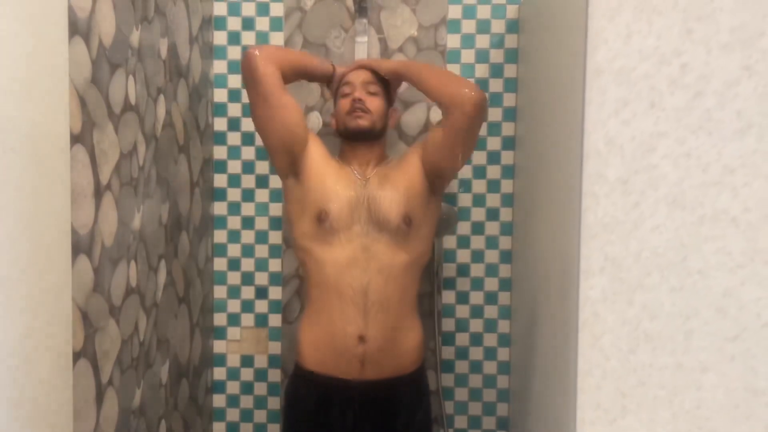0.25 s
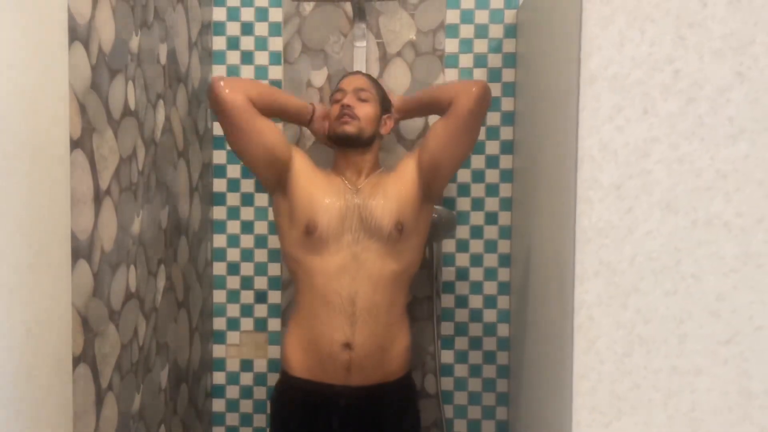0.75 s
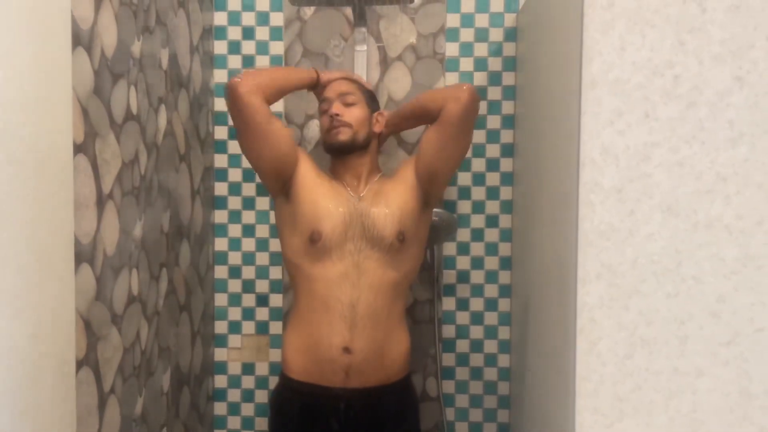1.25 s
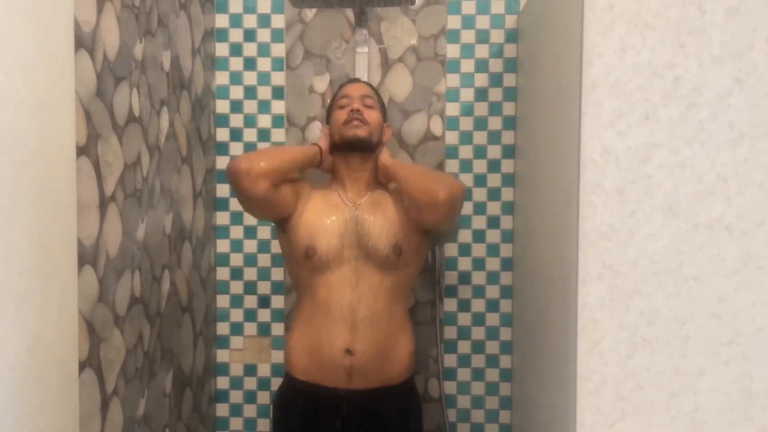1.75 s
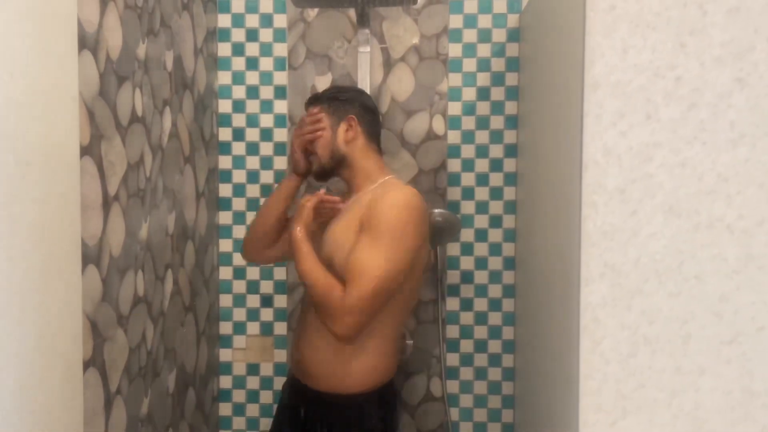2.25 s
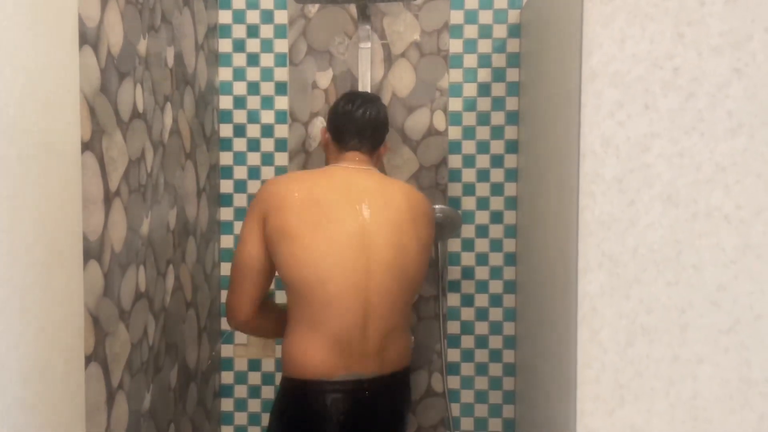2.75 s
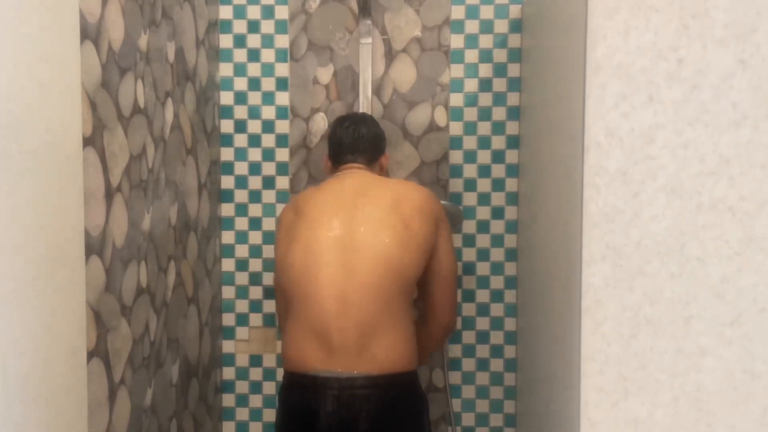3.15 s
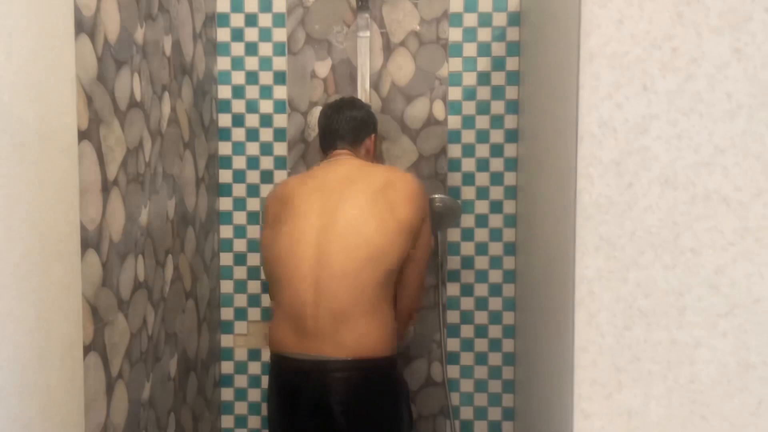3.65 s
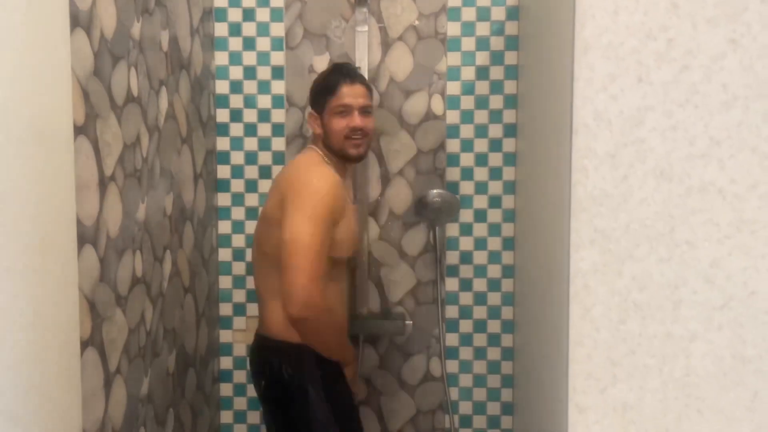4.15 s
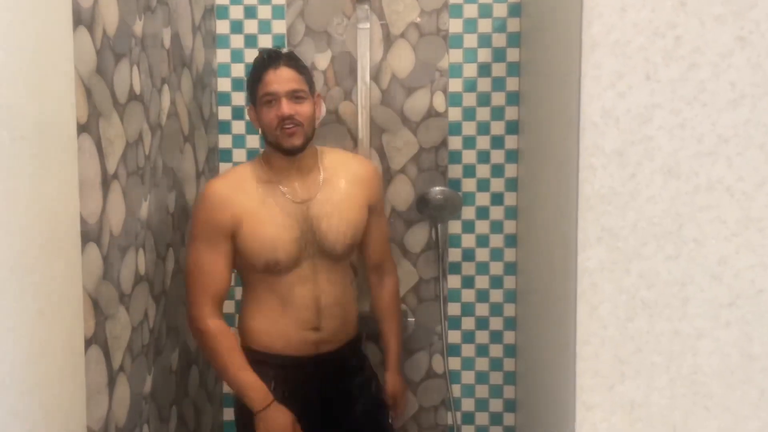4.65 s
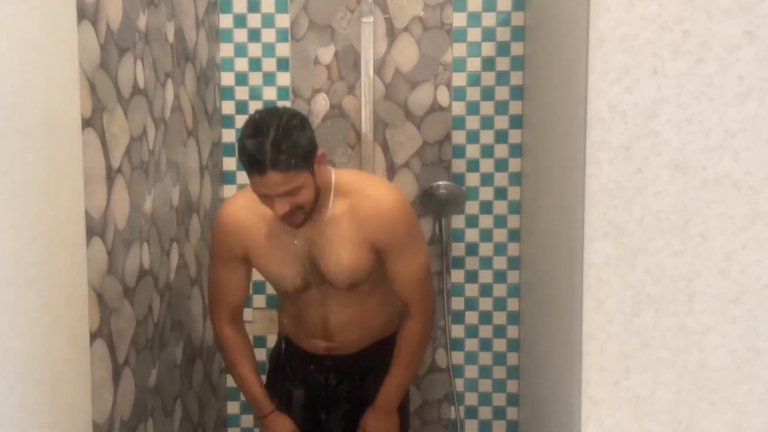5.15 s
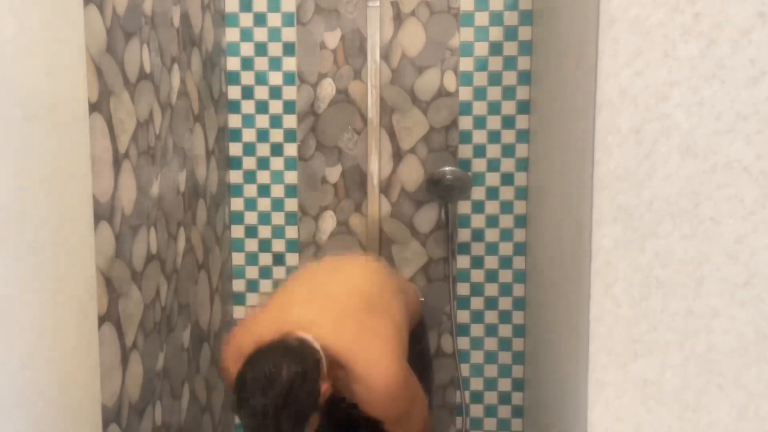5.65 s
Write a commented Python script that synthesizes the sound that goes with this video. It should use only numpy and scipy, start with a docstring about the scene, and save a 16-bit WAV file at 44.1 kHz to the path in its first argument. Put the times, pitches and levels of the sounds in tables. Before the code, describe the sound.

An overhead shower runs throughout in a small tiled stall. Fine spray hisses continuously, grained with tiny ticks, while heavy drops running off a body smack the wet floor at irregular moments, each with a sharp crack and quick wall echoes. Splats crowd the first second, thin out midway and grow heavier near the end. A low, wavering roar lies beneath. Close stereo pickup, bright but cut off at the very top.

```python
"""A small tiled stall with an overhead shower running, heard at two microphone ports a few centimetres apart.
Fine spray hisses as coloured noise; heavy drops run off a body and splat on the wet floor, each a sharp crack
with wall echoes and a ringing band of noise. Spatter, smaller drops and short clicks fill the gaps, and
bubbles plink as decaying sines. A low roar, noise picked out by resonances, fills the stall's standing waves."""
import sys
import numpy as np
from scipy import signal
from scipy.fft import rfft, irfft, next_fast_len
from scipy.io import wavfile
from scipy.ndimage import uniform_filter1d, map_coordinates

SR = 44100
rng = np.random.default_rng(int(sys.argv[2]) if len(sys.argv) > 2 else 0)


def unload_wav(signal):
    """Save mono or channel-first audio to the path in sys.argv[1] as 16-bit WAV at rate SR, clipped to [-1, 1]."""
    wavfile.write(
        sys.argv[1],
        SR,
        np.round(np.clip(np.atleast_2d(signal).T, -1, 1) * 32767).astype(np.int16),
    )


N = 260101

# Flow of the spray. Each row: time in seconds, level in dB before the tilt,
# brightness in dB (added to the bright part and taken from the dull part).
SPRAY_FLOW = [(0, -42.5, 2.5), (.4, -44.5, -2), (.8, -44, 1), (1.2, -43, 1), (1.6, -41.5, 2.5),
              (2.0, -44.5, -1.5), (2.4, -44.5, -2), (2.8, -43.5, -1.5), (3.2, -41.5, 2.5), (3.6, -39.5, 1),
              (3.9, -45.5, -2), (4.2, -44, -2), (4.6, -37, 2.5), (4.9, -42.5, 0), (5.2, -41.5, 1),
              (5.5, -40.5, -2.5), (5.9, -40, 2)]
# Colour of the spray, also shared by the drops. Each row: frequency in Hz, relative density in dB per Hz.
SPRAY_COLOUR = [(700, -30), (1500, -8), (2500, -5), (4000, -4), (5500, -4.5), (7000, -4), (9600, -5),
                (10500, -7), (11500, -11), (13000, -19), (14200, -23), (15700, -25)]


def spray():
    """Superposition: countless fine droplets merge into coloured noise, its dull and bright parts tilted."""
    flow_db, bright_db = curves(SPRAY_FLOW)
    mist = hiss(spray_gain, patchy_db=1.4)
    dull = filtered(mist, lambda hz: 1 / (1 + (hz / 6000) ** 4))
    bright = mist - dull
    return amp(flow_db) * (amp(-bright_db) * dull + amp(bright_db) * bright)


def spray_gain(hz):
    """Spectral envelope: the gain of the spray's colour at each frequency."""
    return amp(along(SPRAY_COLOUR, hz)[0])


# Heavy drops on the floor. Each row: start in seconds, splash level in dB, centre in Hz,
# octaves from the centre to half gain, crack relative to the splash in dB before the gain common to all cracks.
HEAVY_DROPS = [(0.0147, -42, 8800, 0.35, 10.5), (0.0825, -36, 11600, 1, 3), (0.1103, -37.5, 10400, 0.5, 2),
               (0.2322, -35, 3900, 0.93, 0), (0.2362, -37.5, 4400, 0.37, -1), (0.3215, -41, 11580, 0.63, 2),
               (0.331, -40, 5040, 0.37, 1), (0.4766, -43, 6200, 1.8, 11), (0.4926, -42, 10600, 0.41, 6),
               (0.533, -39.5, 7900, 0.46, 12), (0.5891, -44.5, 10500, 0.36, 7),
               (0.639, -39.5, 12500, 1.1, 2), (0.6627, -34, 6060, 0.38, -5), (0.668, -34.5, 4200, 0.71, 1),
               (0.686, -34.5, 2380, 0.37, -5), (0.755, -42.5, 2270, 1.1, -7), (0.815, -45, 2400, 0.32, 1),
               (0.9056, -43, 10600, 0.21, 7), (1.137, -44, 9250, 0.64, 5), (1.1757, -41.5, 10300, 0.28, -4),
               (1.2383, -45, 12500, 0.39, 8), (1.26, -39, 5800, 0.69, 12), (1.338, -35.5, 5830, 0.5, -11),
               (1.4366, -45, 10800, 0.4, 4), (1.482, -45, 10800, 0.49, 13), (1.4826, -38.5, 5900, 0.26, 6),
               (1.572, -46, 4000, .3, 3), (1.5813, -45.5, 5000, 0.26, 6), (1.608, -39.5, 12500, .5, 12.5),
               (1.6984, -44, 10500, 0.82, 10), (1.74, -38, 6750, 0.49, 5), (1.8032, -40.5, 2000, 0.44, -6),
               (1.8224, -38.5, 7000, 2.3, 9), (1.9016, -40.5, 10800, 0.39, 7),
               (1.9027, -39.5, 4430, 0.55, 5), (1.948, -42.5, 8980, 1.1, 9),
               (2.0886, -44, 11830, 0.71, 11.5), (2.1814, -41.5, 8600, 0.32, 1),
               (2.3362, -36, 9000, 0.35, 9), (2.4142, -38.5, 6100, 1.1, 9), (2.5175, -40, 8650, 1.2, -1),
               (2.5475, -34, 4530, 0.69, 1), (2.6084, -39.5, 12500, 0.49, -2),
               (2.875, -43, 11720, 0.44, 6.5), (3.023, -50, 10500, 0.24, 8), (3.0768, -44, 3940, 0.58, 0),
               (3.167, -39.5, 3430, 1, -2), (3.296, -38, 9900, 0.56, 2), (3.39, -38, 9000, 1, 5),
               (3.555, -38, 4860, 0.71, 2), (3.775, -40, 4030, 0.3, -3), (3.7768, -43.5, 2500, 0.3, -5),
               (3.872, -42.5, 9360, 0.63, -5), (4.0402, -49, 9000, 0.11, 11),
               (4.1218, -32, 5840, 1.16, 5.5), (4.222, -36, 9910, 1, 6), (4.366, -34.5, 5560, 1.3, 0),
               (4.4953, -33.5, 10000, 1.1, 6), (4.6209, -32, 3700, 0.84, 4), (4.635, -40, 5830, .3, -10),
               (4.6917, -34, 6270, 1.2, 6), (4.9735, -36, 9550, 0.75, -2), (5.1418, -45, 2480, 1, 1),
               (5.168, -38, 5500, 1.3, 9), (5.4696, -32.5, 3450, 0.58, -4), (5.502, -41.5, 6530, 0.22, -2),
               (5.6591, -42, 12500, 0.4, -8), (5.7728, -34, 7800, 0.57, 8.5)]
# Ring time in seconds at the reference pitch in Hz, and the power by which higher splats die sooner.
SPLAT_T60_S, T60_AT_HZ, T60_FALLS = 0.5, 3960, 0.26


def heavy_drops():
    """Frequency-dependent decay: the higher the pitch of a splat, the shorter its ring."""
    s, db, centre_hz, width, crack_db = np.transpose(HEAVY_DROPS)
    t60 = SPLAT_T60_S * (T60_AT_HZ / centre_hz) ** T60_FALLS
    rows = np.column_stack([s, db, centre_hz, width, t60, crack_db])
    return splats(rows, size=16384, lumpy_db=-1.0)


# Thrown-up droplets: mean flight (s), highest level against the parent (dB), pitch scatter either way (octaves).
FLIGHT_S, SPATTER_DB, SPATTER_OCTAVES = .03, -7, 0.3
# Their band (octaves to half gain) and ring time (s).
SPATTER_WIDTH, SPATTER_T60_S = 0.25, 0.07


def spatter(count):
    """Secondary impacts: droplets thrown up by each heavy drop land after exponentially distributed flights."""
    s, db, centre_hz = np.repeat(np.array(HEAVY_DROPS)[:, :3], count, axis=0).T
    draw, same = rng.random((len(s), 3)), np.ones(len(s))
    land = np.minimum(s - FLIGHT_S * np.log(1 - draw[:, 0]), N / SR)
    level_db = db + SPATTER_DB - 4 * draw[:, 2]
    pitch_hz = centre_hz * 2 ** (SPATTER_OCTAVES * (2 * draw[:, 1] - 1))
    rows = np.column_stack([land, level_db, pitch_hz, SPATTER_WIDTH * same, SPATTER_T60_S * same, -3 * same])
    return splats(rows, size=4096, lumpy_db=5.0)


def patter(count, level_db, spread_db, crack_db):
    """Random arrivals: smaller drops land at uniformly random times, loud ones rarer than faint ones."""
    draw = rng.random((count, 4))
    s = draw[:, 0] * N / SR
    db = level_db - spread_db * np.log(1 - .9 * draw[:, 1])
    # centres reach far above the audible range; those bands are heard by their lower skirts
    centre_hz = 4000 * 28.0 ** draw[:, 2]
    width = 1.0 + 1.2 * draw[:, 3]
    rows = np.column_stack([s, db, centre_hz, width, np.full(count, .12), np.full(count, crack_db)])
    return splats(rows, size=4096, lumpy_db=4)


def splats(rows, size, lumpy_db):
    """Impact and decay: each drop cracks on the tiles, then rings on as band noise with exponential decay."""
    s, db, centre_hz, width, t60, crack_db = (c[:, None] for c in np.transpose(rows))
    t = np.arange(size) / SR
    white = rng.standard_normal((2, len(rows), size))
    noise = unit(irfft(rfft(white) * band(centre_hz, width, size), size))
    # droplets land in clumps of a millisecond or so, which blur as the ring goes on
    clumps = unit(uniform_filter1d(rng.standard_normal((len(rows), size)), 60))
    lumps_db = lumpy_db * clumps * np.exp(-t / 0.0078)
    attack = 1 - np.exp(-t / 0.0017)
    sound = noise * amp(db + lumps_db - 60 * t / t60) * attack
    # the first contact is short, so it spreads over a wider band; 14 dB is common to all cracks
    crack = cracks(centre_hz, 1.2 * width, size=2048) * amp(db + crack_db + 14.0)
    sound[..., :crack.shape[-1]] += crack
    at = (np.round(s * SR).astype(int) + np.arange(size)).ravel()
    return np.array([np.bincount(at, side.ravel(), N + size)[:N] for side in sound])


def band(centre_hz, width, size):
    """Band-pass filtering: each drop's band is cut from the colour of the spray."""
    hz = np.fft.rfftfreq(size, 1 / SR)
    octaves = np.log2((hz + 1) / centre_hz)
    return spray_gain(hz) / (1 + np.abs(octaves / width) ** 3)


# Direct crack, then echoes from the tiled walls, the nearest almost as loud.
# Each row: mean delay in seconds, mean level in dB.
WALL_ECHOES = [(0, -.5), (.0019, -1.5), (.0042, -4), (.0072, -8), (.009, -5), (.0112, -9), (.0135, -9),
               (.018, -14), (.023, -17), (.031, -20)]
CONTACT_S = 0.0003  # decay constant of the contact, as a drop flattens on the tiles


def cracks(centre_hz, width, size):
    """Early reflections: a short contact burst is repeated by the walls at slightly scattered delays."""
    gain, hz = band(centre_hz, width, size), np.fft.rfftfreq(size, 1 / SR)
    delay, wall_db = np.transpose(WALL_ECHOES)
    draw = rng.standard_normal((len(width), len(WALL_ECHOES), 4))
    when = 0.000427 + delay * np.exp(0.05 * draw[..., 0])
    # the direct crack lies mostly in one of the two versions; each echo takes its own share of both
    turn = np.pi * np.tanh(draw[..., 1]) * np.clip(delay / .005, 0, 1) ** 2 + .2
    echo_db = wall_db + 2.5 * np.tanh(draw[..., 2]) * (delay > 0)
    share = amp(echo_db) * np.array([np.cos(turn), np.sin(turn)])
    # c: version, d: drop, w: wall, f: frequency
    train = np.einsum("cdw,dwf->cdf", share, np.exp(-2j * np.pi * hz * when[..., None]))
    burst = rng.standard_normal((len(width), 128)) * np.exp(-np.arange(128) / SR / CONTACT_S)
    smear = rfft(burst / np.linalg.norm(burst, axis=1, keepdims=True), size)
    peak = irfft(gain, size)[:, :1]
    return irfft(train * gain * smear, size) / peak


# Loud single clicks, many of them strong wall echoes of the heavy drops. Each row: time of the peak in seconds,
# envelope peak in dB, centre in Hz, width in octaves (standard deviation of the band).
CLICKS = [(.0834, -28, 10300, .12), (.2327, -26, 3900, .35), (.7737, -30, 2400, .25),
          (1.338, -30, 5600, .3), (1.4849, -22, 5900, 0.19), (0.2364, -15, 4500, .35),
          (.2416, -21, 4300, .2), (.2458, -24, 4300, .35), (.5351, -30, 6600, .2), (.6632, -18, 5900, .35),
          (.672, -25, 4500, .4), (.6742, -23, 5100, 0.22), (.6912, -24, 2400, 0.39), (1.742, -29, 5530, .3),
          (1.8237, -28, 4900, .3), (1.9045, -30, 5200, .15), (1.9114, -28, 4300, .25),
          (2.0897, -29, 10400, .12), (2.2488, -37, 10100, .12), (2.3388, -31, 5200, .2),
          (2.4098, -33, 5700, 0.18), (2.4155, -22, 5200, 0.18), (2.5478, -24, 10500, 0.11),
          (2.55, -13, 4800, 0.37), (2.5569, -26, 4500, .4), (2.6104, -30, 10600, .12),
          (2.6516, -32, 10600, .15), (2.7634, -36, 10800, 0.13), (2.9436, -28, 10300, .12),
          (3.301, -27, 10200, .1), (3.3908, -27, 10300, .12), (3.4134, -29, 5400, .35),
          (3.5532, -29, 5100, .4), (3.7825, -31, 3800, .25), (4.3119, -32, 10500, .12),
          (4.3673, -22, 4800, 0.25), (4.381, -20, 5300, 0.27), (4.3944, -33, 10900, .15),
          (4.4975, -17, 9900, 0.097), (4.5389, -29, 10000, .12), (4.5955, -34, 10500, .12),
          (4.6215, -25, 4070, 0.22), (4.625, -14, 3500, .27), (4.6924, -24, 5900, .25),
          (4.702, -26, 6200, .25), (5.0305, -29, 10400, .12), (5.17, -27, 3000, .2),
          (5.1766, -28, 5600, .3), (5.213, -30, 10200, .12), (5.2406, -27, 9900, .12),
          (5.4712, -14.5, 3940, 0.13), (5.4749, -21, 4300, .35), (5.4953, -27, 3500, .25),
          (5.504, -29, 6600, .15), (5.7776, -27, 6400, .25)]


def clicks(rows):
    """Time-bandwidth reciprocity: each click is a Gaussian burst, shorter as its band is wider."""
    out, t = np.zeros((2, N + 256)), np.arange(-128, 128) / SR
    turns = rng.uniform(0, 2 * np.pi, len(rows))
    for (s, db, hz, width), turn in zip(rows, turns):
        spread = 2 * np.pi * np.log(2) * np.clip(width, .08, .6) * hz  # radians per second
        burst = np.exp(-.5 * (spread * t) ** 2) * np.cos(2 * np.pi * hz * t + turn)
        out[:, round(s * SR):][:, :len(t)] += amp(db) * burst * [[1], [.2]]
    return out[:, 128:N + 128]  # puts each peak at its time


def fizz(count, level_db, spread_db):
    """Granularity: many faint droplets click at random times and give the spray its grain."""
    draw = rng.random((count, 4))
    s = draw[:, 0] * N / SR
    db = level_db - spread_db * np.log(1 - .95 * draw[:, 1])
    hz = 2000 * 6 ** draw[:, 2]
    return clicks(np.column_stack([s, db, hz, .08 + .2 * draw[:, 3]]))


# Bubbles trapped in the puddle. Each row: start in seconds, level in dB, starting pitch in Hz,
# time to fall 60 dB in seconds.
BUBBLES = [(.2395, -31, 4200, .03), (.688, -30, 2150, .05), (.6985, -27, 2400, .02),
           (1.5808, -31, 5000, .03), (1.803, -33, 2250, .025), (3.169, -35, 3550, .04),
           (3.467, -36, 3600, .03), (3.555, -33, 5050, .05), (3.776, -36, 2250, .03),
           (3.801, -35, 3950, .07), (3.780, -34, 4300, .03), (4.6205, -21, 4050, .02),
           (4.629, -26, 2700, .03), (5.2765, -31, 2800, .06), (5.479, -30, 4050, .05)]


def plinks():
    """Bubble resonance: a bubble rings as a decaying sine and rises in pitch as it nears the surface."""
    out, t = np.zeros((2, N + SR)), np.arange(SR // 8) / SR
    for s, db, hz, t60 in BUBBLES:
        phase = 2 * np.pi * hz * (t + 0.0054 * t ** 2 / t60) + rng.uniform(0, 2 * np.pi)
        envelope = amp(db - 60 * t / t60) * (1 - np.exp(-t / 0.0004))
        out[:, round(s * SR):][:, :len(t)] += envelope * np.sin(phase) * [[1], [.3]]
    return out[:, :N]


# Standing waves of the stall: the lowest, the deep band, the upper band, steady ones around these, higher ones.
# Each row: frequency in Hz, width at half amplitude in Hz, relative level in dB.
LOWEST_WAVE = [(46.3, 11, 0)]
DEEP_WAVES = [(77.7, 10.9, 0)]
UPPER_WAVES = [(134.5, 13, 0), (146.4, 10, -5)]
STEADY_WAVES = [(62, 9, -0.5), (92.4, 11.8, -2), (101, 8, -13), (121.4, 12, -3), (162.7, 15.7, -1),
                (181, 10, -2.5)]
HIGHER_WAVES = [(205.8, 10.5, -4.5), (249.1, 10, 0.5), (280.4, 20, -8), (352, 14.5, -6), (387.6, 14, -10.5),
                (537, 10.4, -9.5), (592, 9.8, -13), (990, 16, -18.5), (1270, 24, -17.5), (1306, 17, -14.5)]
# Chance level wander of the two low noise bands. Each row: time in seconds, level in dB before smoothing.
DEEP_WANDER = [(0.0, -32), (0.05, -26), (0.1, -47), (0.15, -36), (0.26, -22.5), (0.34, -39), (0.39, -34),
               (0.72, -30), (0.79, -43), (0.84, -24.5), (1.07, -33.5), (1.1, -45), (1.18, -29.5),
               (1.74, -35), (2.17, -25.5), (2.81, -35.5), (2.91, -22), (2.97, -33), (3.66, -37),
               (3.69, -26.5), (3.74, -37), (3.79, -34), (3.96, -42.5), (4.25, -23), (4.4, -34.5),
               (4.58, -28.5), (4.71, -46), (4.76, -28), (4.99, -29), (5.04, -39.5), (5.39, -26),
               (5.45, -46), (5.5, -28.5), (5.78, -35), (5.85, -24.5), (5.9, -33)]
UPPER_WANDER = [(0.0, -34), (0.44, -34), (0.51, -37.5), (0.69, -29), (0.77, -41.5), (1.02, -30.5),
                (1.08, -61), (1.1, -30.5), (1.43, -44), (1.48, -23.5), (1.54, -41), (1.69, -26),
                (1.72, -36), (1.95, -41), (2.02, -31.5), (2.12, -31), (2.18, -30), (2.23, -35), (2.63, -30),
                (3.02, -40.5), (3.07, -28.5), (3.56, -38.5), (3.61, -30), (3.73, -57), (3.76, -33),
                (4.76, -35.5), (4.8, -54), (4.85, -30.5), (5.24, -37), (5.27, -31.5), (5.37, -33.5),
                (5.39, -42), (5.68, -27), (5.77, -41), (5.82, -31), (5.9, -49)]
# Broad wash under the higher waves. Each row: frequency in Hz, relative density in dB per Hz.
WASH_COLOUR = [(20, -14), (110, -4.5), (150, -19.5), (230, -4.5), (400, -10.5), (640, -16.5), (780, -14.5),
               (1100, -20.5), (1500, -22.5), (2200, -27.5), (4000, -47.5)]
LOWEST_DB, STEADY_DB, WASH_DB = -41, -35.5, -33.0
DEEP_FLUTTER_DB, UPPER_FLUTTER_DB = 1.5, 1.5  # depth of the random flutter


def roar():
    """Room modes: noise picked out by the standing waves of the stall lies over a broad wash."""
    (deep_db,), (upper_db,) = curves(DEEP_WANDER), curves(UPPER_WANDER)
    lowest = low_band(LOWEST_WAVE, LOWEST_DB, 0)
    deep = low_band(DEEP_WAVES, deep_db, DEEP_FLUTTER_DB)
    upper = low_band(UPPER_WAVES, upper_db, UPPER_FLUTTER_DB)
    steady = hiss(lambda hz: resonances(STEADY_WAVES, hz), patchy_db=1.5)

    def wash_gain(hz):
        return np.hypot(resonances(HIGHER_WAVES, hz), amp(along(WASH_COLOUR, hz)[0]))
    wash = hiss(wash_gain, patchy_db=1.18)
    return lowest + deep + upper + amp(STEADY_DB) * steady + amp(WASH_DB) * wash


FLUTTER_PER_S = 14  # random knots a second in the flutter of the low bands


def low_band(modes, level_db, flutter_db):
    """Narrow-band noise: levelled noise flutters at random about a given level, then resonances smooth it."""
    x = hiss(lambda hz: resonances(modes, hz), patchy_db=-1)
    level = np.sqrt(np.abs(uniform_filter1d(x[0] ** 2, SR // 14)) + .02)
    fluttering = unit(x / level * amp(flutter_db * wobble(FLUTTER_PER_S)))
    wide = [(hz, 2.2 * width, 0) for hz, width, _ in modes]
    return filtered(amp(level_db) * fluttering, lambda hz: np.minimum(resonances(wide, hz), 1))


def wobble(rate):
    """Interpolation: a smooth random curve through the given number of knots a second."""
    knots = rng.standard_normal(int(N * rate / SR) + 4)
    return map_coordinates(knots, [np.arange(N) * rate / SR])


def hiss(gain, patchy_db):
    """Filtered noise: two unrelated noises of rms 1, coloured by gain(Hz), with shared patches of level."""
    z = signal.stft(rng.standard_normal((2, N)), nperseg=512)[2]
    field = uniform_filter1d(uniform_filter1d(rng.standard_normal(z.shape[1:]), 8, 0), 8, 1)
    pair = signal.istft(z * amp(patchy_db * field / field.std()), nperseg=512)[1][:, :N]
    return unit(filtered(pair, gain))


def resonances(modes, hz):
    """Power summation: the joint gain of resonances given by Hz, width in Hz and level in dB."""
    return np.sqrt(sum(amp(db) ** 2 / (1 + (2 * (hz - c) / w) ** 2) ** 2 for c, w, db in modes))


def filtered(x, response):
    """Linear filtering: the spectrum of x times a complex response of frequency."""
    m = next_fast_len(x.shape[-1] + 8192)
    return irfft(rfft(x, m) * response(np.fft.rfftfreq(m, 1 / SR)), m)[..., :x.shape[-1]]


def amp(db):
    """Decibel scale: the amplitude gain of a level in dB."""
    return 10 ** (np.asarray(db) / 20)


def unit(x):
    """Normalisation: x scaled to rms 1 along time."""
    return x / np.sqrt(np.mean(x ** 2, axis=-1, keepdims=True) + 1e-20)


def along(points, hz):
    """Logarithmic pitch: each column after the first, interpolated on a log-frequency axis."""
    f, *cols = np.transpose(points)
    return np.array([np.interp(np.log(hz + 1), np.log(f + 1), c) for c in cols])


def curves(rows):
    """Linear interpolation: one value per sample for each column after the time."""
    s, *cols = np.transpose(rows)
    return [np.interp(np.arange(N) / SR, s, c) for c in cols]


# Stereo likeness, lead and balance of the two channels by frequency, as set for this sound.
# Each row: frequency in Hz, likeness from 0 to 1, lead of the right in radians, left minus right in dB.
STEREO_IMAGE = [(70, .993, 0, 0), (130, .96, 0, -.6), (250, .88, -.06, -1.5), (360, .74, -.25, 0),
                (520, .6, -.45, .5), (1100, .35, -1.1, 0), (1450, .15, -1.1, -1), (1750, .27, 1.3, -.5),
                (2400, .5, -.4, 0), (3150, .3, -1.05, 1.5), (3450, .5, 0, 2.5), (4100, .72, -.15, 3),
                (4900, .52, -.8, 4.5), (6200, .78, .35, 2.5), (7000, .73, 1.4, 2), (7550, .82, 2.4, 1),
                (7800, .995, 3.12, 0), (8600, .995, 3.2, 0), (9100, .82, 4.0, 0), (10200, .76, 5.2, 0),
                (10800, .995, 6.26, 0), (12400, .99, 6.3, 0), (13000, .8, 6.5, 0), (13400, .3, 7.8, 0),
                (13900, .99, 9.42, 0), (15700, .99, 9.42, 0)]


def stereo(pair):
    """Stereo mixing: two versions of a sound are mixed to the set likeness, lead and balance of the channels."""
    def mix(hz):
        alike, lead, tilt_db = along(STEREO_IMAGE, hz)
        turn = np.arccos(np.clip(alike, 0, 1)) / 2
        half = amp(tilt_db / 2) * np.exp(-.5j * lead)
        left = [half * np.cos(turn), half * np.sin(turn)]
        right = [np.cos(turn) / half, -np.sin(turn) / half]
        return np.array([left, right])
    return filtered(pair[None], mix).sum(1)


def scene():
    """Superposition: spray, drops, clicks, bubbles and roar add and are mixed to two channels."""
    drops = heavy_drops() + spatter(count=5)
    drops = drops + patter(count=300, level_db=-60.0, spread_db=7.5, crack_db=1)
    short = clicks(CLICKS) + fizz(count=1500, level_db=-44, spread_db=4)
    return stereo(spray() + drops + short + plinks() + roar())


# Cavities of the microphone ports. Each row: frequency in Hz, width at half amplitude in Hz,
# level in dB of the resonance added to the direct sound.
PORT_CAVITIES = [(8400, 1000, -4.5)]
TOP_HZ = 15780  # band limit


def record(dry):
    """Cavity resonance: the ports lift the treble, between a low cut near 34 Hz and a sharp band limit."""
    def response(hz):
        low_cut = 1 / (1 + (34 / (hz + 1)) ** 6)
        return (1 + resonances(PORT_CAVITIES, hz)) * low_cut * (hz < TOP_HZ)
    return filtered(dry, response)


dry = scene()
out = record(dry)
unload_wav(out)
```